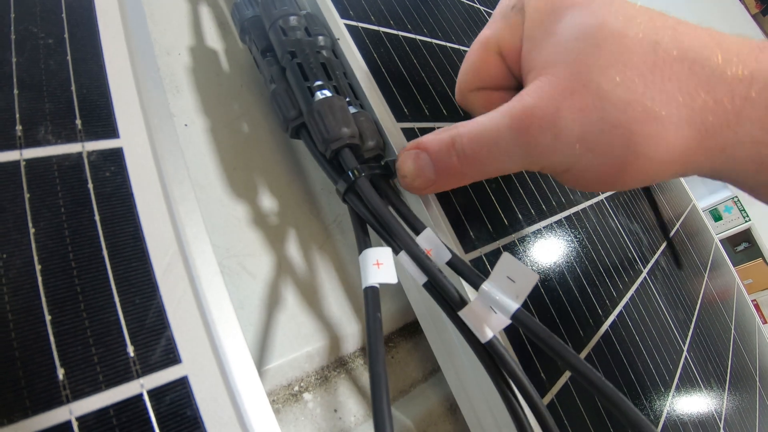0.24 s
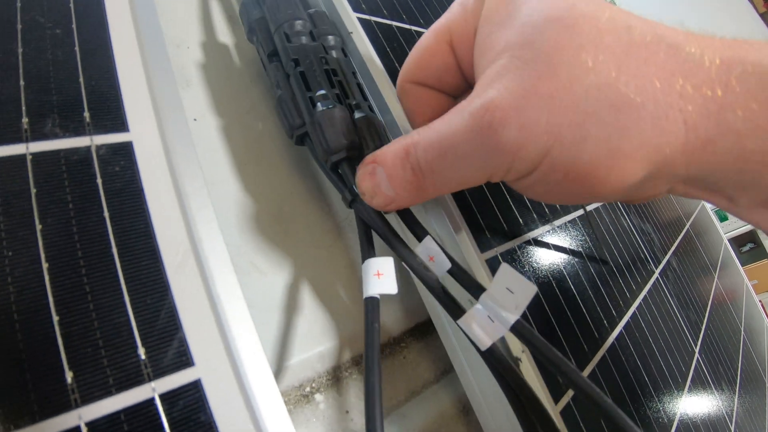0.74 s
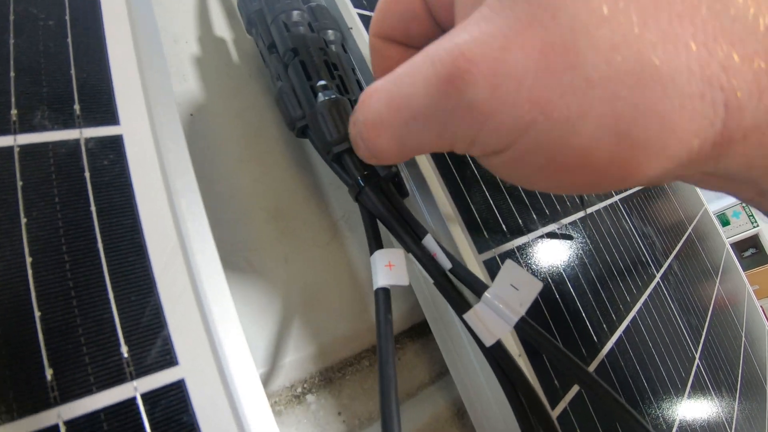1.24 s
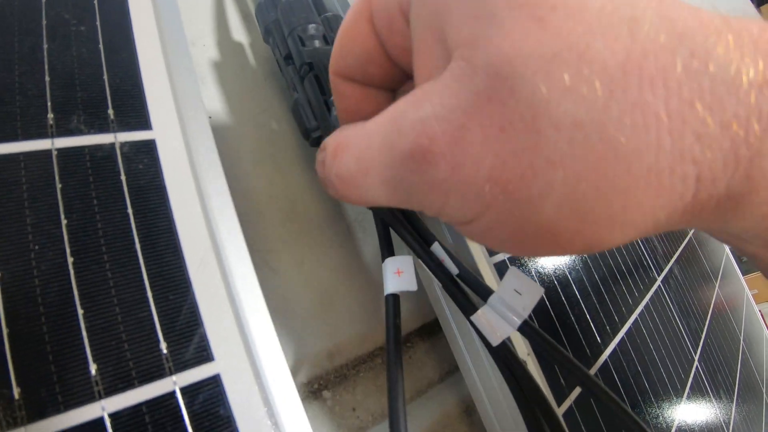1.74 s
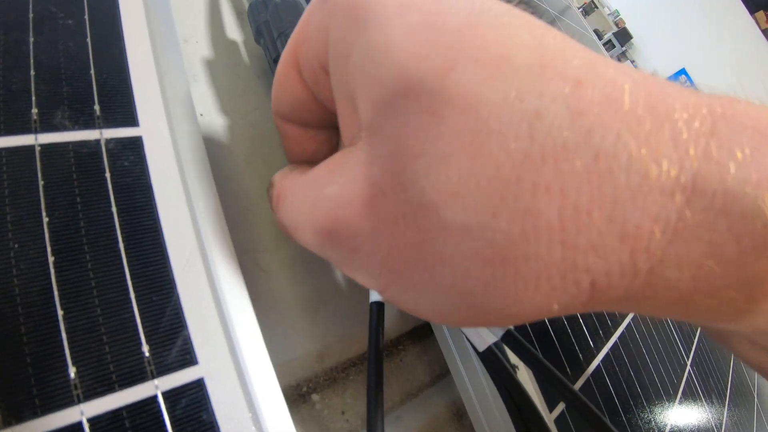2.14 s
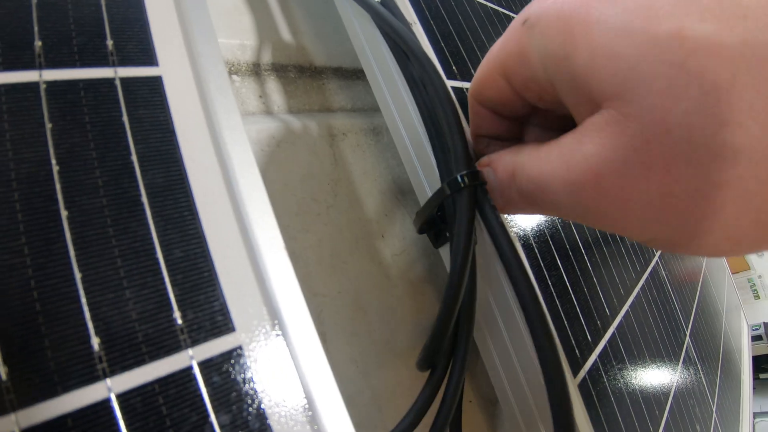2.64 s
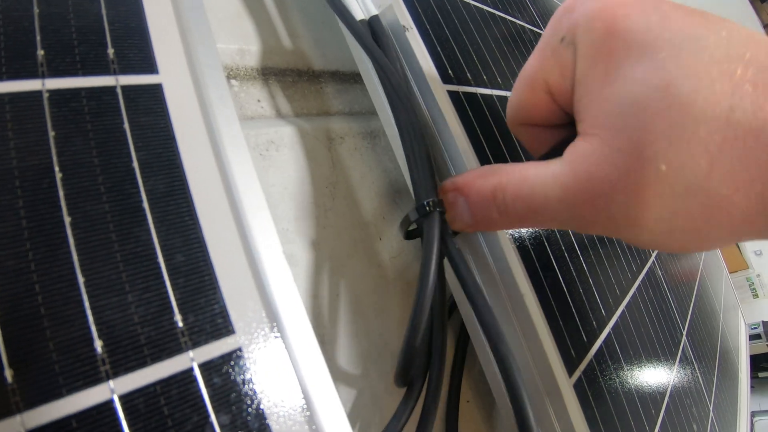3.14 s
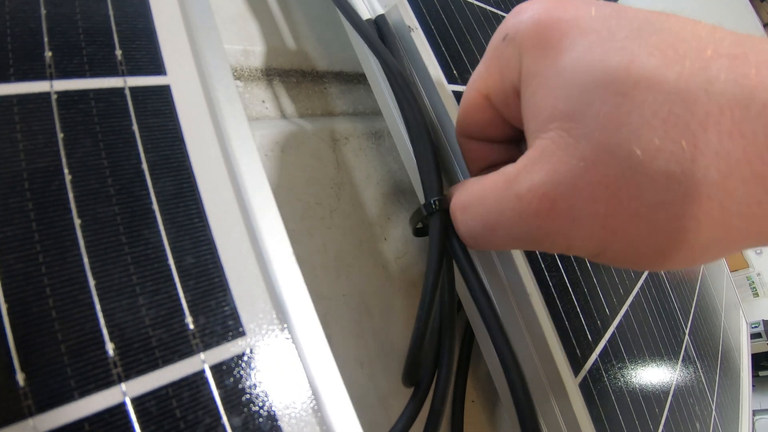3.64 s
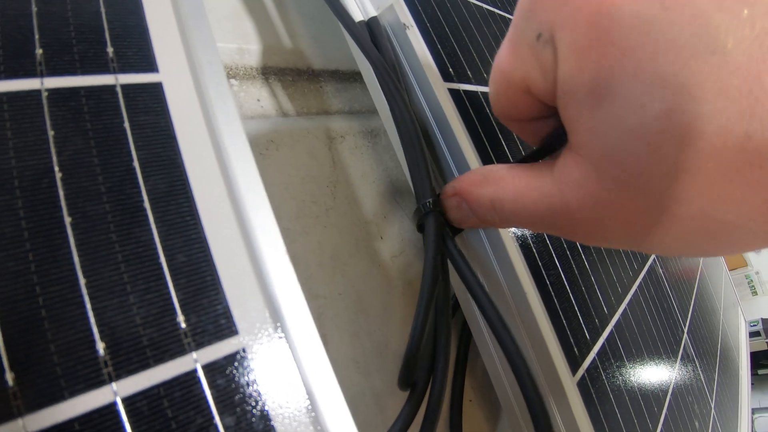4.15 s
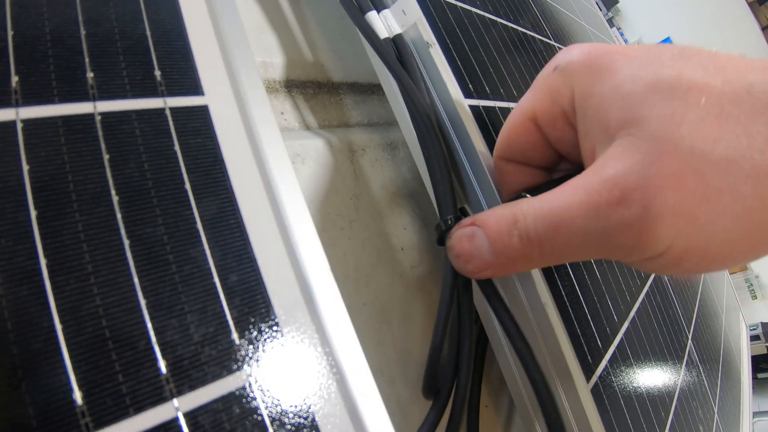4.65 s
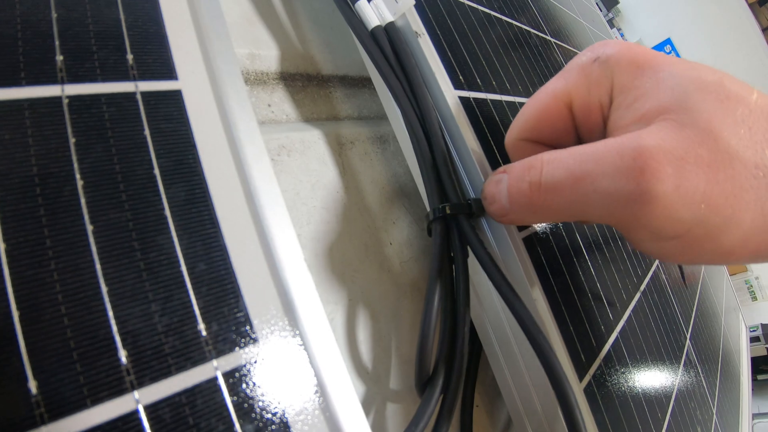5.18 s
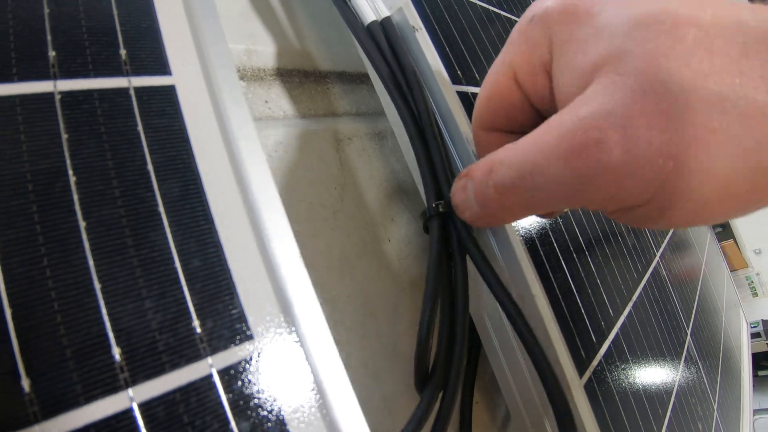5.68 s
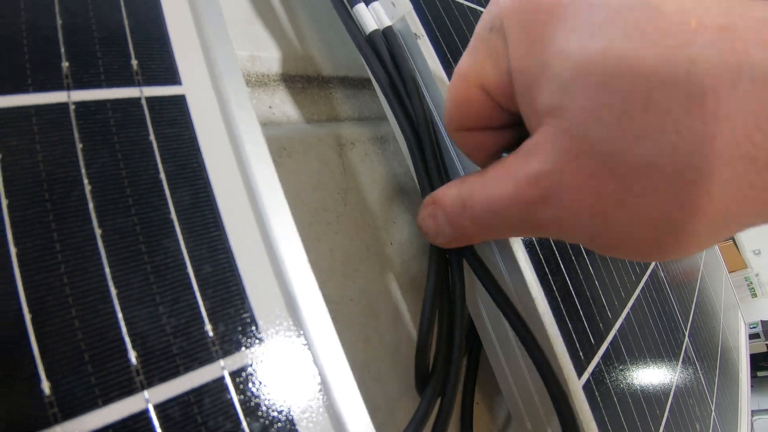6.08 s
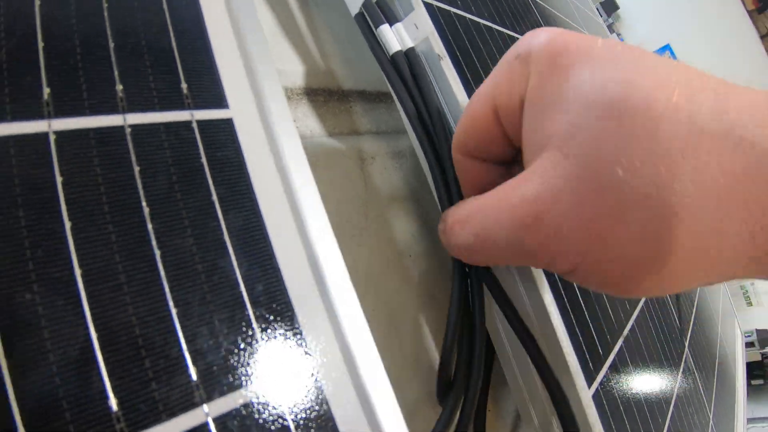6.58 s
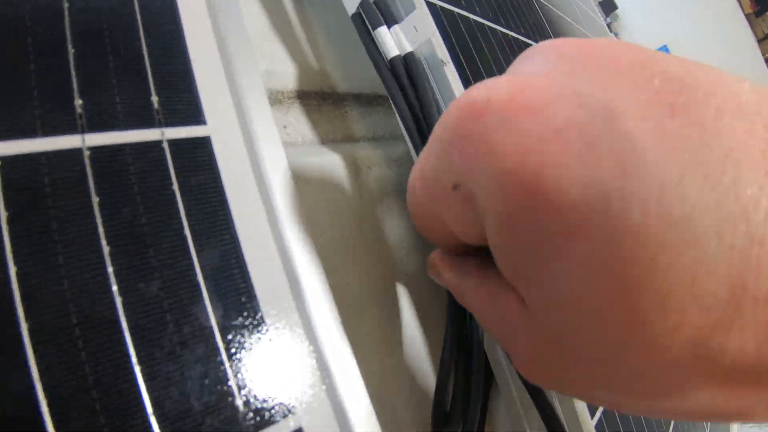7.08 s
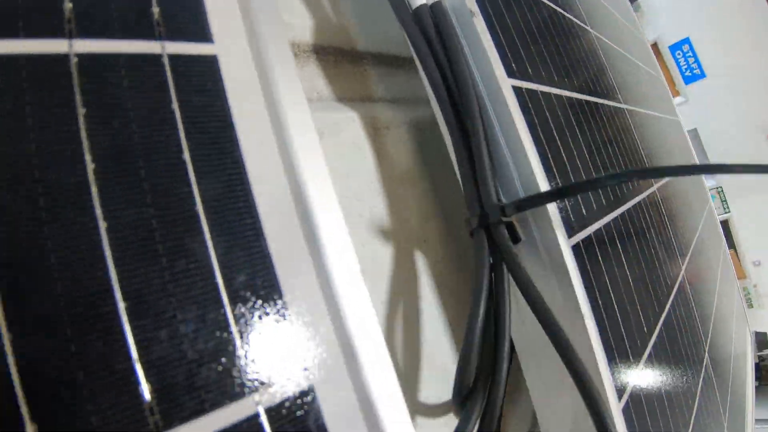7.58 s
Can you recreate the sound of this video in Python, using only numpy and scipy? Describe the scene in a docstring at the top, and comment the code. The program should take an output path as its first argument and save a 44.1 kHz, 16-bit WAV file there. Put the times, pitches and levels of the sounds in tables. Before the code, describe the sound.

Close, sharp zipping of nylon ties cinched round cables on a hollow panel, broken by hard knocks, soft brushing and low air rumble.

```python
"""Nylon cable ties are pulled tight round cables on a roof panel in a large bare space.
Throughout: steady background noise, slow air rumbling in the microphone, a hand leaning on the panel (noise into its modes).
From the first instant teeth snap past the pawl (ringing tie modes, panel kicks), and a long tail (decaying noise) answers.
Then cables and hands knock (noise bursts into modes), fingers brush the tie (hiss), the hand thumps softly
(deep panel modes) and the strap drags along the cables (noise through its resonances)."""
import sys
import numpy as np
from scipy import signal
from scipy.fft import rfft, irfft, next_fast_len
from scipy.io import wavfile
from scipy.ndimage import map_coordinates

SR = 44100
rng = np.random.default_rng(int(sys.argv[2]) if len(sys.argv) > 2 else 0)


def amplitude_ratio(level_db):
    """Convert a level in decibels to the matching linear amplitude (field) ratio."""
    exponent = np.asarray(level_db, float) / 20
    return 10 ** exponent


def put_to_file(sound):
    """Save the sound as 16-bit audio at rate SR, in the file named by the first command-line argument."""
    columns = np.atleast_2d(sound).T  # one column per channel
    safe = np.clip(columns, -1, 1)
    whole_steps = np.round(safe * 32767)
    wavfile.write(sys.argv[1], SR, whole_steps.astype(np.int16))


N = 344846


def unit(x):
    """Scale to rms 1."""
    return x / np.sqrt(np.mean(x ** 2) + 1e-20)


def along(points, hz, column=1):
    """Read one column of (Hz, ..) rows on a log axis."""
    rows = np.transpose(points)
    return np.interp(np.log(hz + 1), np.log(rows[0] + 1), rows[column])


def wobble(rate_hz):
    """A smooth random curve, rate_hz knots a second."""
    knots = rng.standard_normal(int(N * rate_hz / SR) + 4)
    return map_coordinates(knots, [np.arange(N) * rate_hz / SR])


def filtered(x, response):
    """x times a complex response of frequency."""
    m = next_fast_len(N + SR)
    return irfft(rfft(x, m) * response(np.fft.rfftfreq(m, 1 / SR)), m)[..., :N]


def peak(f, hz, width_hz):
    """One causal resonance, gain 1 at its centre."""
    return 1j * f * width_hz / (hz * hz - f * f + 1j * f * width_hz)


def width_of(t60_s):
    """Bandwidth in Hz of a resonance that falls 60 dB in t60_s."""
    return np.log(1000) / (np.pi * t60_s)


def noise(spectrum):
    """Coloured noise of rms 1."""
    return unit(filtered(rng.standard_normal(N), lambda f: amplitude_ratio(along(spectrum, f))))


def grain(depth_db, rate_hz):
    """White noise of unsteady level, as of uneven friction."""
    return amplitude_ratio(depth_db * wobble(rate_hz)) * rng.standard_normal(N)


def scatter(times, rows):
    """Sum one short wave per event at its time."""
    where = np.round(np.asarray(times) * SR).astype(int)[:, None] + np.arange(rows.shape[1])
    return np.bincount(where.ravel(), rows.ravel(), N + rows.shape[1])[:N]


def bursts(times, levels_db, t60_s, tail_t60_s, tail_db, size=4096, alike=0):
    """A sharp noise burst plus a weaker, slower rattle per event; alike: share of noise power common to all."""
    t = np.arange(size) / SR
    shape = amplitude_ratio(-60 * t / t60_s) + amplitude_ratio(tail_db - 60 * t / tail_t60_s)
    common = np.sqrt(alike) * rng.standard_normal(size)
    hiss = common + np.sqrt(1 - alike) * rng.standard_normal((len(times), size))
    return scatter(times, amplitude_ratio(levels_db)[:, None] * shape * hiss)


def single_blow(times, levels_db, t60_s, *rattle):
    """The energy of a burst in one sample: the far walls blend its many paths to a smooth colour."""
    return scatter(times, amplitude_ratio(levels_db)[:, None] * np.sqrt(t60_s * SR / np.log(1e6)))


def swells(starts, holds, levels_db, rise_db_per_s, fall_db_per_s, rest_db):
    """A gain that climbs to each level, holds, falls away and otherwise rests."""
    t = np.arange(0, N + 64, 64) / SR
    ramps = [db - rise_db_per_s * np.clip(s - t, 0, None) - fall_db_per_s * np.clip(t - s - hold, 0, None)
             for s, hold, db in zip(starts, holds, levels_db)]
    level_db = np.maximum(np.max(ramps, axis=0), rest_db)
    return np.interp(np.arange(N) / SR, t, amplitude_ratio(level_db))


def stroke(start_s, end_s):
    """Half-sine swell of one stroke, slightly broadened."""
    t = np.arange(N) / SR
    return np.sin(np.pi * np.clip((t - start_s) / (end_s - start_s), 0, 1)) ** 0.89


# Panel modes. Each row: frequency in Hz, relative level in dB, undamped t60 in seconds.
PANEL_MODES = [(100.5, -5, 0.2), (229.8, -1.5, 0.33), (273, -1.5, 0.84), (370.3, -1, 0.11),
               (491, -3.5, 0.12), (650.3, 2, 0.066), (736.6, 3, 0.055), (902, 0.5, 0.055),
               (1151, -3, 0.059), (1328, -5, 0.036), (1680, -13, 0.025), (2038, -14, 0.013),
               (2565, -20, 0.036)]


def panel(deep_force, upper_force, damping):
    """Panel modes, the first four and the rest rung by their own force; damping widens them, shortening the ring."""
    modes = []
    for k, (hz, db, t60_s) in enumerate(PANEL_MODES):
        width_hz = damping * width_of(t60_s)
        modes.append(((-1) ** k * amplitude_ratio(db) / np.sqrt(width_hz), hz, width_hz))

    def ring(force, part):
        return filtered(force, lambda f: sum(gain * peak(f, hz, width_hz) for gain, hz, width_hz in part))

    return ring(deep_force, modes[:4]) + ring(upper_force, modes[4:])


# Background spectrum. Each row: frequency in Hz, relative density in dB per Hz.
BACKGROUND_SPECTRUM = [(47, -32.5), (80, 1.5), (289, -17), (346, -28.5), (718, -17.5), (2270, -37),
                       (4420, -40), (14600, -60), (16000, -58.5)]


def background():
    """Steady coloured noise."""
    return amplitude_ratio(-48.5) * noise(BACKGROUND_SPECTRUM)


# Rumble spectrum. Each row: frequency in Hz, relative density in dB per Hz.
RUMBLE_SPECTRUM = [(1, -10.5), (3, -3), (17, 4), (30, -7.5), (60, -15.5), (130, -31), (400, -65.5)]
# Puffs of slow air. Each row: start in seconds, hold in seconds, level in dB.
AIR_PUFFS = [(0.0, 0.023, -37), (0.84, 0.11, -27.5), (1.19, 0.083, -27.5), (1.71, 0.039, -26),
             (2.3, 0.042, -28), (2.452, 1.4, -33), (3.94, 0.044, -26), (5.1, .1, -33), (5.932, 0.024, -30),
             (6.21, 0.035, -30.5), (6.62, 0.23, -30.5), (7.38, 0.02, -29), (7.72, 0.12, -23.5)]
AIR_RISE_DB_PER_S, AIR_FALL_DB_PER_S, CALM_DB = 82, 53, -34.5


def air():
    """Slow air at the microphone: unsteady low noise that swells with each puff."""
    gain = swells(*np.transpose(AIR_PUFFS), AIR_RISE_DB_PER_S, AIR_FALL_DB_PER_S, CALM_DB)
    return gain * unit(amplitude_ratio(1.4 * wobble(4.7)) * noise(RUMBLE_SPECTRUM))


# Hand leaning and shifting on the panel. Each row: start in seconds, hold in seconds,
# relative level in dB of the deep modes, of the upper modes.
HAND_SHIFTS = [(0.0, 0.043, -26.5, -26), (0.46, 0.086, -43.5, -41.5), (0.73, 0.17, -36.5, -35),
               (1.541, 0.05, -45, -37.5), (2.858, 0.39, -34.5, -27.5), (3.17, 0.029, -24.5, -44),
               (3.73, .18, -46, -29.5), (3.969, 0.019, -25.5, -32), (4.128, 0.01, -36.5, -37),
               (4.56, .2, -43, -49), (4.82, 0.054, -25, -36.5), (5.777, 0.11, -32.5, -30.5),
               (6.6, 0.16, -37.5, -41), (7.17, .6, -46, -40.5)]
HAND_RISE_DB_PER_S, HAND_FALL_DB_PER_S = 900, 99
RESTING_DEEP_DB, RESTING_UPPER_DB = -52, -58  # relative, as in the table


def hand_shifts():
    """Uneven friction noise into the panel, which the hand damps heavily."""
    s, hold_s, deep_db, upper_db = np.transpose(HAND_SHIFTS)
    deep = swells(s, hold_s, deep_db, HAND_RISE_DB_PER_S, HAND_FALL_DB_PER_S, RESTING_DEEP_DB)
    upper = swells(s, hold_s, upper_db, HAND_RISE_DB_PER_S, HAND_FALL_DB_PER_S, RESTING_UPPER_DB)
    return panel(amplitude_ratio(35.5) * deep * grain(3.5, 33), amplitude_ratio(32.0) * upper * grain(2.9, 45), damping=5.55)


# Pulls on the strap. Each row: start in seconds, then points of: teeth passed,
# gap since the tooth before in ms, relative snap level in dB.
STRAP_PULLS = [(0.002, [(0, 0, -20), (1, 4.6, -19), (9, 5.5, -21), (16, 10.5, -18), (18, 15.8, -15),
               (20, 16.8, -18), (22, 36.9, -18)]), (0.7188, [(0, 0, -21), (1, 16.5, -19), (3, 9.6, -17),
               (6, 15.1, -17), (8, 12.6, -17)]), (0.9304, [(0, 0, -23), (1, 27.7, -23), (2, 22.9, -29),
               (4, 29.3, -35), (5, 53.3, -36)]), (2.8512, [(0, 0, -24), (1, 19.7, -24), (2, 12.0, -22),
               (6, 12.5, -21), (11, 8.9, -20)]), (2.9926, [(0, 0, -17), (1, 11.7, -16), (9, 7.6, -23),
               (11, 10.5, -26)]), (3.205, [(0, 0, -18), (1, 8.1, -15), (3, 6.6, -16), (5, 11.7, -20)]),
               (3.7261, [(0, 0, -20), (1, 20, -20), (2, 12.1, -19), (3, 7.6, -19), (7, 11.3, -18),
               (13, 8.3, -21), (15, 11.1, -22), (16, 15.1, -22)]), (3.9448, [(0, 0, -21), (1, 28.9, -22),
               (3, 45.8, -22), (4, 51.2, -21)]), (5.7707, [(0, 0, -12), (1, 16.2, -15), (3, 12.9, -20),
               (4, 15.6, -25), (6, 28.4, -25), (7, 23.5, -29), (8, 38.8, -39)])]
# Single teeth gained as the strap bites. Each row: time in seconds, relative snap level in dB.
SINGLE_CLICKS = [(1.1573, -19), (1.2181, -16.5), (1.325, -20.5), (1.7268, -27.5), (1.9428, -34.5),
                 (3.1039, -11.5), (3.113, -15), (3.131, -12), (3.1394, -13), (3.1644, -13.5),
                 (3.1857, -12.5), (3.1958, -28), (4.4156, -46), (4.819, -12), (4.865, -18.5), (4.8793, -20),
                 (4.899, -22), (5.0158, -21.5), (5.163, -53), (6.577, -18.5), (6.6043, -23.5),
                 (6.6562, -41)]
SNAP_SCATTER_DB = 1.3


def tooth_times():
    """Time and level of every tooth: pulls interpolated tooth by tooth, then single clicks; levels scattered."""
    rows = [np.array(SINGLE_CLICKS)]
    for start_s, points in STRAP_PULLS:
        passed, gap_ms, db = np.transpose(points)
        k = np.arange(passed[-1] + 1)
        times_s = start_s + np.cumsum(np.interp(k, passed, gap_ms)) / 1000
        rows.append(np.transpose([times_s, np.interp(k, passed, db)]))
    s, db = np.vstack(rows).T
    return s, db + SNAP_SCATTER_DB * rng.standard_normal(len(s))


# Strap and head modes, each a pair of partials. Each row: centre in Hz, half spacing in Hz, rise time in seconds.
TIE_MODES = [(5300, 850, .0003), (7700, 650, .0004), (10200, 250, .0004), (14200, 800, .0003)]
# Times in seconds at which the fingers take a new grip.
REGRIP_TIMES_S = [0.08, 0.7, 0.9, 1.15, 1.7, 2.8, 2.99, 3.1, 3.136, 3.19, 3.7, 3.93, 4.8, 5.7, 5.84, 6.5]
# Grip colour, first grip to last. Each row: gain in dB of the four tie modes in turn, of the kick to the panel.
GRIP_GAINS_DB = [(-0.5, 0.5, -5, -3, -4), (-3.5, 2, -29, -19, -7.5), (-8.5, -5.5, -23, 3.5, -13.5),
                 (3, 0.5, -20.5, -19, -5), (-8, -5.5, -7, -10, -14), (4, -2, -1, -6, -4),
                 (-0.5, -45, -3, -2.5, -6), (-1.5, -31.5, 1, -12, -2.5), (-3.5, -26, -27, -19, -8.5),
                 (-17.5, -17, -8.5, -8, -6), (3, -9, -5, -30, 1.5), (2.5, -16, -2, -4.5, -3.5),
                 (2.5, -15, -0.5, -6.5, -10.5), (-2, -9.5, -1.5, -11, 8), (-6, -16, 2, -22, -4),
                 (2, 0.5, -2, -14, -14), (-8, -7.5, -0.5, -21, -1)]
# Buzz of the cables under the strap. Each row: one grip's level in dB relative to the snap.
CABLE_BUZZ_DB = [-2, -11, -11, -7, -14.5, -16, -11.5, -6, -13, -19, -9, -18, -12, -11, -32, -24, -19.5]
TEETH_ALIKE = 0.8  # share of rattle noise power that every tooth repeats


def teeth():
    """Each snap rings the four tie modes as the grip allows, rattles on weakly and kicks the panel."""
    s, db = tooth_times()
    grip = np.searchsorted(REGRIP_TIMES_S, s)
    *modes_db, kick_db = db + np.array(GRIP_GAINS_DB)[grip].T
    kick = scatter(s, amplitude_ratio(kick_db + 41.5)[:, None])
    kick = kick + bursts(s, kick_db + 28.5, 0.011, 0.038, -6.5, alike=TEETH_ALIKE)
    out = panel(kick, kick, damping=1.0)
    t = np.arange(512) / SR
    for (hz, spread_hz, rise_s), mode_db in zip(TIE_MODES, modes_db):
        # teeth moulded alike: pitch and phase change only a little from snap to snap
        pitch_hz = hz + spread_hz * (np.array([-1, 1]) + 0.15 * rng.standard_normal((len(s), 2)))
        phase = 0.5 * rng.standard_normal((len(s), 2, 1)) + np.pi / 2
        ring = np.sin(2 * np.pi * pitch_hz[..., None] * (t - rise_s) + phase).sum(axis=1)
        envelope = t / rise_s * np.exp(1 - t / rise_s)
        out = out + scatter(s, amplitude_ratio(mode_db - 8.0)[:, None] * envelope * ring)
        rattle = bursts(s + rise_s, mode_db + 1, 0.014, 0.07, -15, alike=TEETH_ALIKE)
        out = out + filtered(rattle, lambda f: peak(f, hz, 2500 + 3 * spread_hz) ** 2
                             * (1j * f / (3600 + 1j * f)) ** 3)
    # the cables under the strap buzz a little longer and lower
    buzz = bursts(s, db + np.array(CABLE_BUZZ_DB)[grip], 0.008, 0.081, -7.5, alike=TEETH_ALIKE)
    return out + filtered(buzz, lambda f: peak(f, 2900, 1900) ** 2 + amplitude_ratio(3) * peak(f, 2550, 140))


# Decay of the space. Each row: frequency in Hz, t60 in seconds, relative level in dB.
HALL_DECAY = [(103.6, 1.1, -5.5), (500, 0.77, -10.5), (1500, 0.43, -9.5), (2180, 1.6, -18.5),
              (3000, 1.09, -18.5), (4176, 1.1, -16.5), (6470, 0.78, -20.5), (8610, 1.4, -29),
              (10560, .4, -31.5), (14810, 0.2, -33.5)]


def hall(x):
    """A late tail in which each frequency dies at its own speed, drawn anew every quarter second."""
    out = np.zeros(N + 3 * SR)
    step = SR // 4
    for start in range(0, N, step):
        hz, t, z = signal.stft(rng.standard_normal(SR), SR, nperseg=256)
        level_db = along(HALL_DECAY, hz, column=2)[:, None] - 60 * t / along(HALL_DECAY, hz)[:, None]
        onset = 1 - np.exp(-t / 0.0013)
        tail = signal.istft(z * amplitude_ratio(level_db - 30.0) * onset, SR, nperseg=256)[1]
        wet = signal.fftconvolve(x[start:start + step], tail)
        out[start:start + len(wet)] += wet
    return out[:N]


# Knocks on the panel. Each row: time in seconds, relative level in dB of the thud, of the crack,
# of the bright snap, crack centre in Hz.
PANEL_KNOCKS = [(0.157, -28, -25.5, -43.5, 2900), (0.424, -36, -43, -60.5, 5100),
                (0.883, -32, -68, -61, 2560), (1.365, -13, -5.5, -19, 3960), (2.379, -36, -43.5, -62, 4160),
                (2.81, -45, -58, -62, 2500), (3.247, -39, -36.5, -52, 4170),
                (3.922, -12.5, -14.5, -17.5, 4770), (4.807, -15, -17, -14.5, 4360),
                (5.014, -33, -44.5, -48, 4060), (6.711, -45, -57, -64, 2448), (7.014, -53, -62, -70, 2200),
                (7.112, -51, -64.5, -70, 4630), (7.384, -18, -39.5, -38, 3590),
                (7.435, -28, -44.5, -54, 3470)]
# Long ringing of the panel's metal frame. Each row: frequency in Hz, relative level in dB, t60 in seconds.
FRAME_MODES = [(2110, 0, 1.1), (2170, 2, 1.2), (2230, 4, 1.4), (2280, 2, 1.3), (2330, 1, 1.1),
               (4130, -1, 1.2), (4190, 0, 1.4), (4250, 0, 1.3), (4310, -2, 1.2), (4620, -10, .7)]
KNOCK_DEEP_DB = -12.5  # deep modes, added to the thud level


def knocks(excite):
    """A push and thud in the panel, a crack of cable plastic, a short bright snap and the frame's ring."""
    s, thud_db, crack_db, snap_db, crack_hz = np.transpose(PANEL_KNOCKS)
    blow = scatter(s, amplitude_ratio(thud_db)[:, None])
    push = filtered(amplitude_ratio(38) * blow, lambda f: peak(f, 800, 900) ** 2 * 2000 / (2000 + 1j * f))
    deep_force = excite(s, thud_db + KNOCK_DEEP_DB + 44.0, 0.037, 0.33, -2.0)
    upper_force = excite(s, thud_db + 41.0, 0.0032, 0.13, -6)
    thud = panel(deep_force, upper_force, damping=2.0)
    crack = sum(filtered(excite([at], np.array([db + 12.5]), 0.036, 0.6, -41), lambda f: peak(f, hz, 2500))
                for at, db, hz in zip(s, crack_db, crack_hz))
    snap = filtered(excite(s, snap_db - 1.5, 0.0027, 0.02, -19.5), lambda f: peak(f, 11000, 7000) ** 2)
    # the frame follows the snap level: hard, bright contacts ring it most
    frame = filtered(excite(s, snap_db + 17, 0.018, 0.044, -16.5),
                     lambda f: sum(amplitude_ratio(db) * peak(f, hz, width_of(t60_s)) for hz, db, t60_s in FRAME_MODES))
    return push + thud + crack + snap + frame


# Resonances of the rubbed strap, four lower then four upper.
# Each row: frequency in Hz, width in Hz, relative level in dB.
STRAP_RESONANCES = [(770, 110, 8), (1720, 150, -3), (2600, 200, -11), (2930, 180, -9), (3720, 200, 0),
                    (4700, 380, 0), (5520, 250, -10), (6320, 280, -6)]


def strap_friction():
    """Uneven friction noise through the strap's lower and upper resonances."""
    def rub(part):
        return amplitude_ratio(15) * filtered(grain(1.5, 110), lambda f: sum(
            (-1) ** k * amplitude_ratio(db) * peak(f, hz, width_hz) for k, (hz, width_hz, db) in enumerate(part)))

    return rub(STRAP_RESONANCES[:4]), rub(STRAP_RESONANCES[4:])


# Skin hiss spectrum. Each row: frequency in Hz, relative density in dB per Hz.
SKIN_SPECTRUM = [(2500, -22), (5500, -6), (8200, -10), (10200, 0), (12000, -7), (14500, -5), (16000, -10)]
# Fingers brushing the strap. Each row: start in seconds, end in seconds, level in dB.
FINGER_BRUSHES = [(0.35, 0.423, -54), (0.552, 0.613, -53.5), (2.378, 2.583, -59), (2.724, 2.82, -55.5),
                  (3.442, 3.498, -65.5), (3.575, 3.765, -55), (4.258, 4.398, -64.5), (4.51, 4.565, -57.5),
                  (4.658, 4.814, -61), (5.423, 5.492, -57.5), (5.658, 5.722, -52.5), (5.748, 5.771, -52),
                  (6.186, 6.317, -63), (6.385, 6.445, -55), (6.546, 6.578, -56), (7.18, 7.611, -55.5),
                  (7.564, 7.753, -66)]


def brushes(lower, upper):
    """Unsteady skin hiss in strokes; the strap sounds along under the fingers."""
    skin = unit(amplitude_ratio(2.4 * wobble(60)) * noise(SKIN_SPECTRUM)) + amplitude_ratio(-11) * (lower + upper)
    return skin * sum(amplitude_ratio(db) * stroke(start_s, end_s) for start_s, end_s, db in FINGER_BRUSHES)


# Soft thumps of the hand. Each row: time in seconds, relative level in dB of the deep modes, of the upper modes.
HAND_THUMPS = [(0.424, -28.5, -45), (0.832, -28.5, -48), (3.247, -26, -43), (5.499, -36, -66),
               (6.26, -35.5, -46.5), (6.664, -27, -26), (6.709, -35, -53), (7.145, -44.5, -35.5)]


def thumps(excite):
    """Soft flesh on the panel: mostly the deep modes."""
    s, deep_db, upper_db = np.transpose(HAND_THUMPS)
    deep_force = excite(s, deep_db + 42.5, 0.033, 0.25, -11)
    upper_force = excite(s, upper_db + 38, 0.0064, 0.16, -11)
    ring = panel(deep_force, upper_force, damping=1.9)
    return filtered(ring, lambda f: (1500 / (1500 + 1j * f)) ** 2)


# Strap dragged along the cables. Each row: start in seconds, end in seconds, level in dB,
# gain of the lower resonances against the upper in dB.
STRAP_DRAGS = [(0.547, 0.783, -60, 12.5), (2.376, 2.589, -67.5, 0), (2.73, 2.85, -68, 2),
               (4.227, 4.39, -62.5, 6), (4.539, 4.813, -51, 4), (7.167, 7.577, -58.5, 9.5),
               (7.576, 7.756, -62, -7)]


def drags(lower, upper):
    """Strokes of strap friction, each with its own balance of lower and upper resonances."""
    return sum(amplitude_ratio(db) * stroke(start_s, end_s) * (upper + amplitude_ratio(lower_db) * lower)
               for start_s, end_s, db, lower_db in STRAP_DRAGS)


# Faint difference between the channels. Each row: frequency in Hz, gain in dB on the sound before a random wobble.
CHANNEL_DIFFERENCE = [(60, -48), (500, -43.5), (2000, -24.5), (8000, -19.5), (14000, -14.5)]


def scene():
    """All sources lie in the middle; the channels differ only faintly."""
    snaps = teeth()
    lower, upper = strap_friction()
    echo = hall(amplitude_ratio(1.5) * snaps + knocks(single_blow) + thumps(single_blow))
    mid = background() + air() + hand_shifts() + snaps + echo + knocks(bursts)
    mid = mid + brushes(lower, upper) + thumps(bursts) + drags(lower, upper)
    side = filtered(mid, lambda f: amplitude_ratio(along(CHANNEL_DIFFERENCE, f))) * wobble(150)
    return np.array([mid + side, mid - side])


def top_cut(x):
    """Nothing passes above the cut-off."""
    return signal.sosfilt(signal.butter(12, 17010, fs=SR, output="sos"), x)


def record(dry):
    """The loudest peaks round off near full scale; a steep low-pass at 16 kHz limits the band."""
    x = dry / (1 + np.abs(dry / 0.98) ** 6) ** (1 / 6)
    x = filtered(x, lambda f: 1 / (1 + (f / 16000) ** 60))
    return top_cut(x)


dry = scene()
out = record(dry)
put_to_file(out)
```